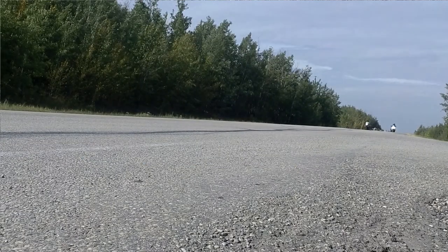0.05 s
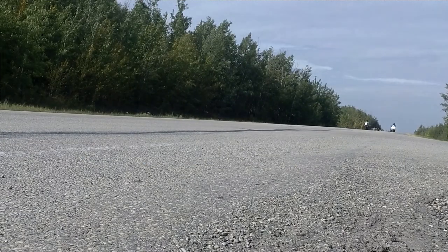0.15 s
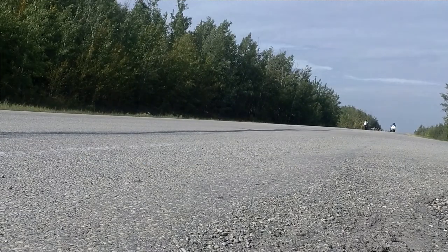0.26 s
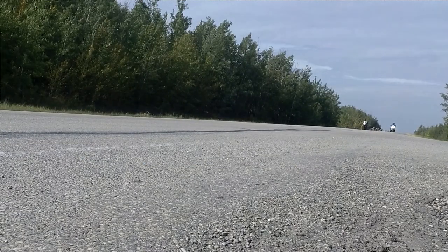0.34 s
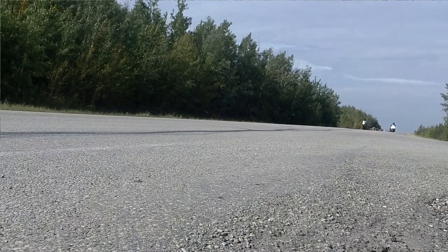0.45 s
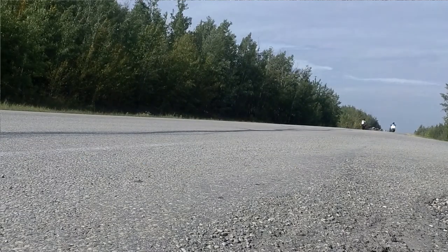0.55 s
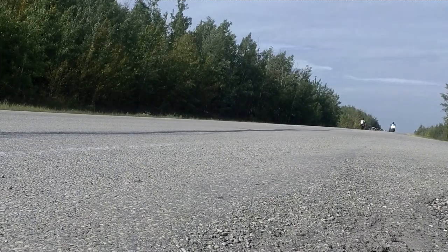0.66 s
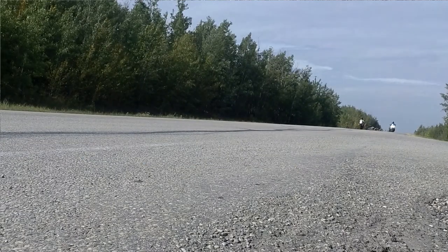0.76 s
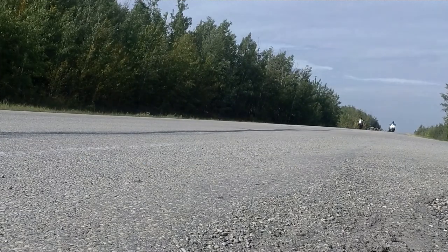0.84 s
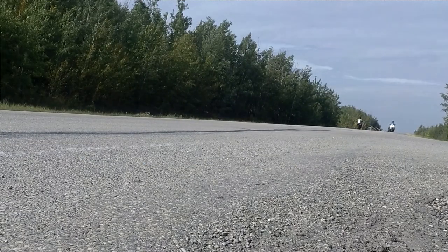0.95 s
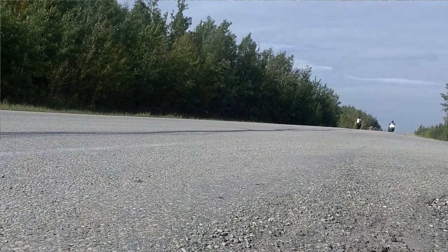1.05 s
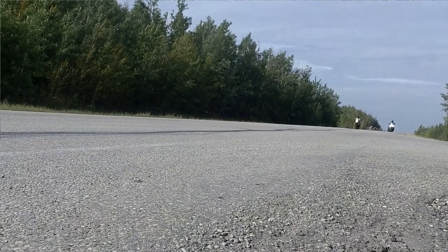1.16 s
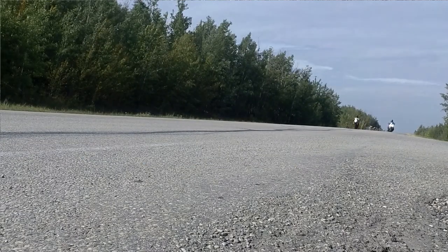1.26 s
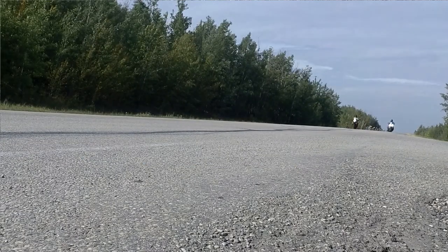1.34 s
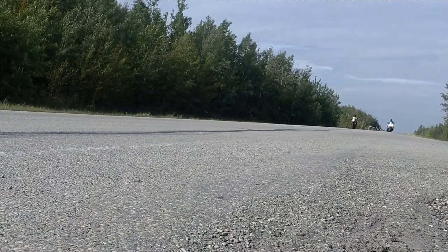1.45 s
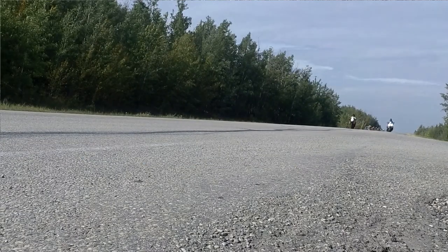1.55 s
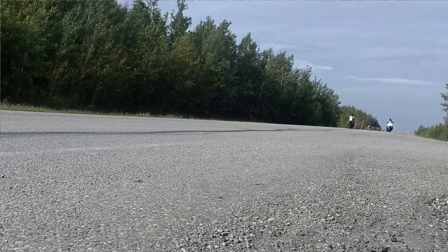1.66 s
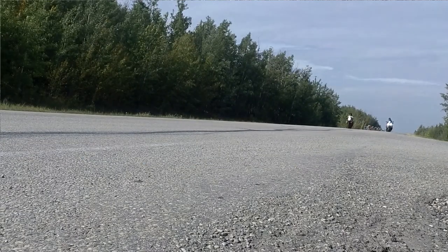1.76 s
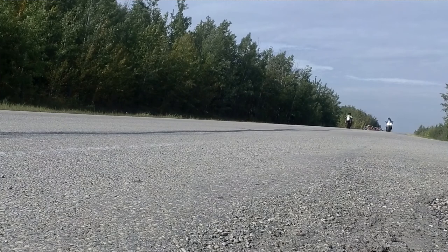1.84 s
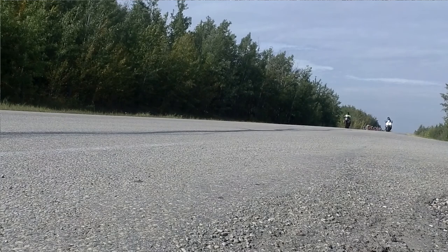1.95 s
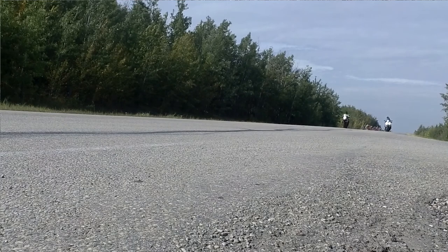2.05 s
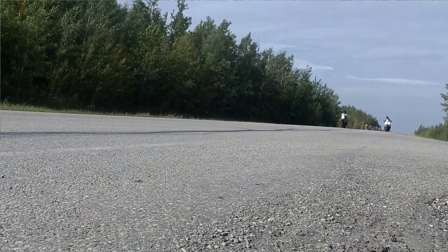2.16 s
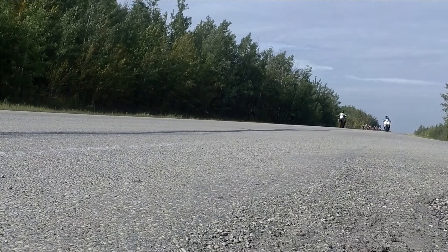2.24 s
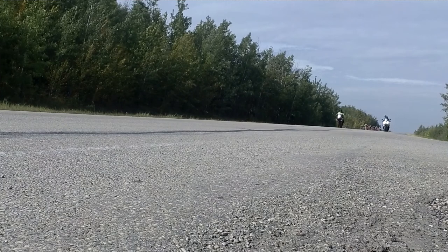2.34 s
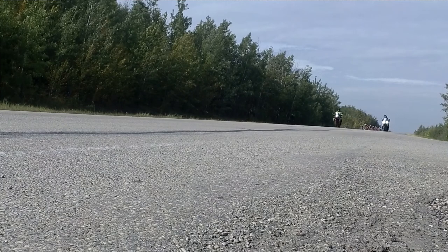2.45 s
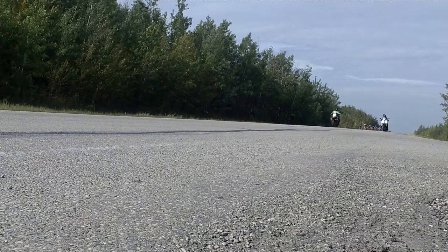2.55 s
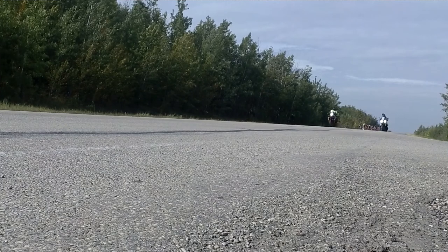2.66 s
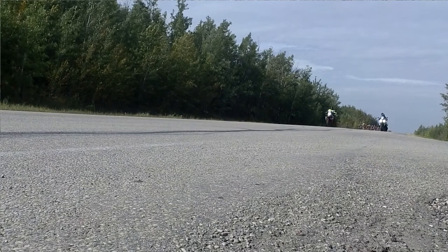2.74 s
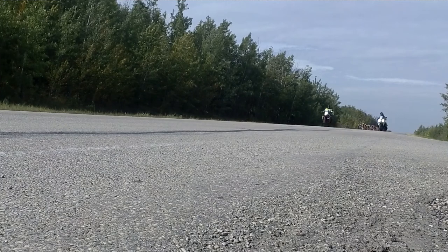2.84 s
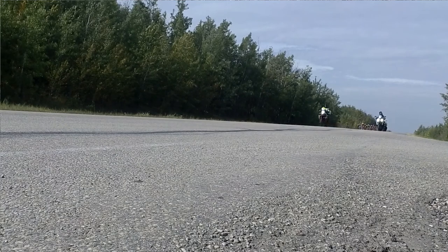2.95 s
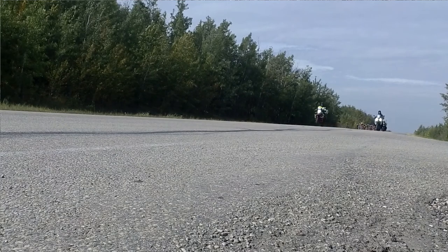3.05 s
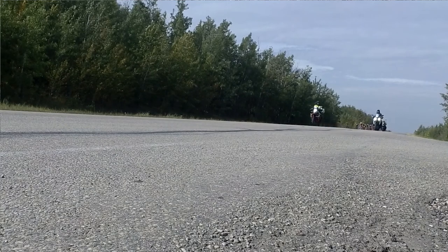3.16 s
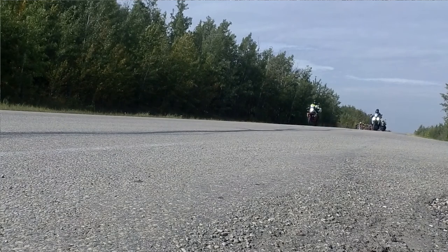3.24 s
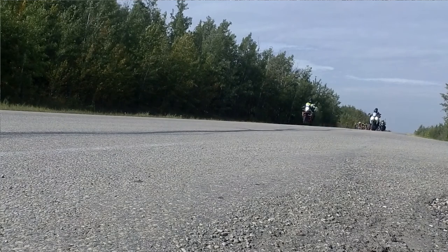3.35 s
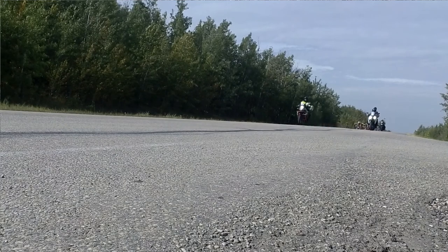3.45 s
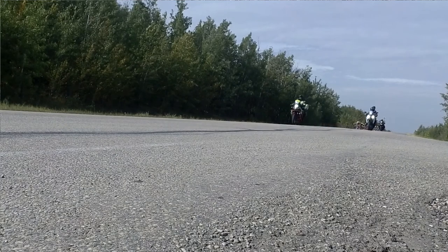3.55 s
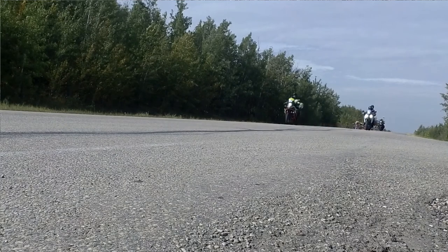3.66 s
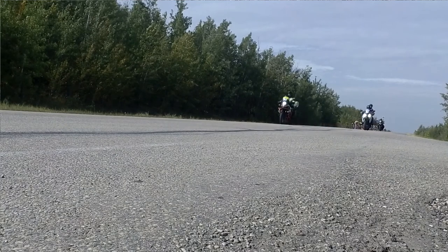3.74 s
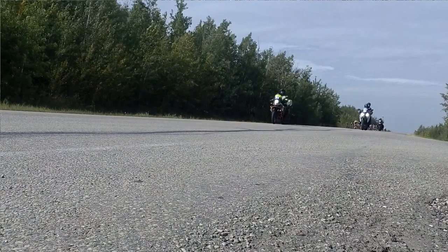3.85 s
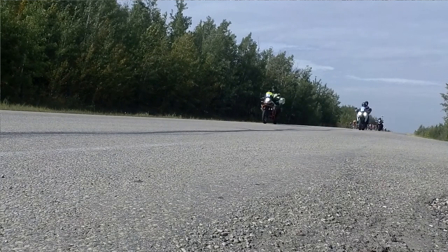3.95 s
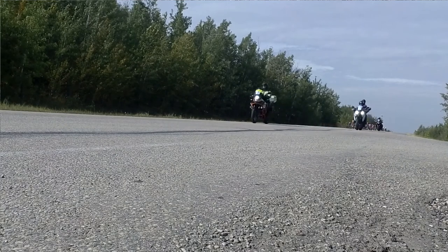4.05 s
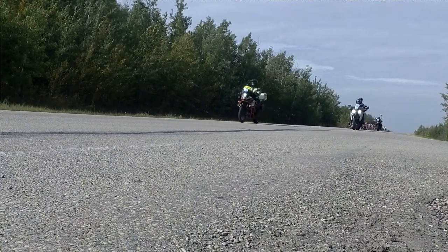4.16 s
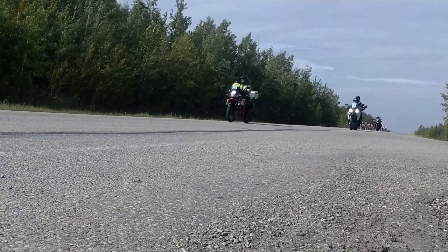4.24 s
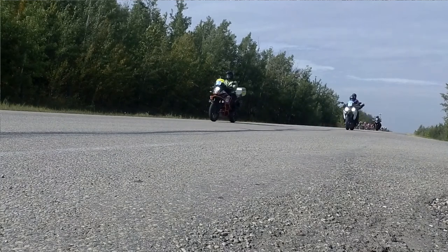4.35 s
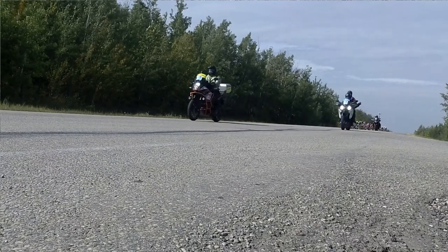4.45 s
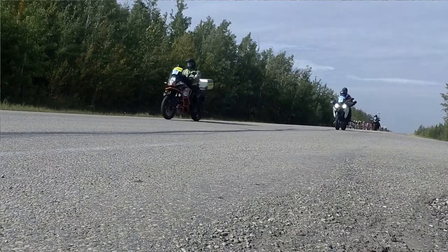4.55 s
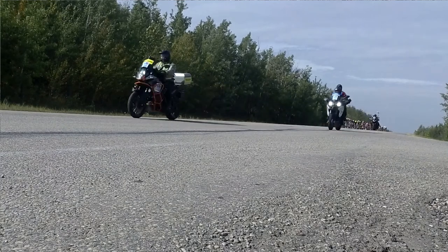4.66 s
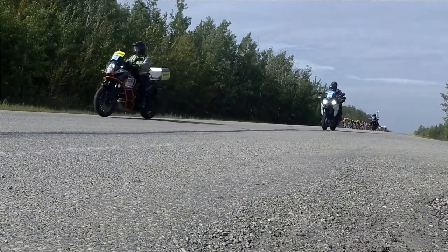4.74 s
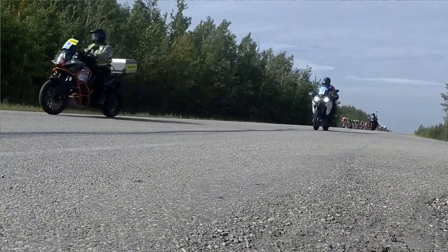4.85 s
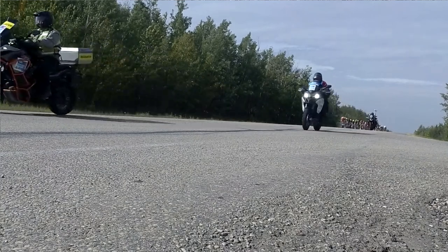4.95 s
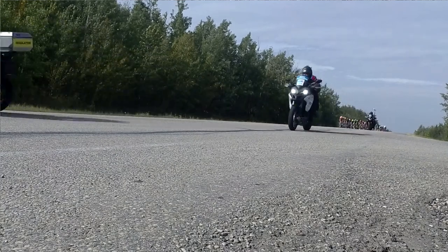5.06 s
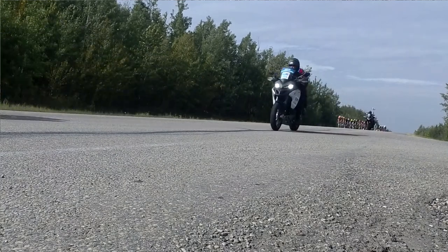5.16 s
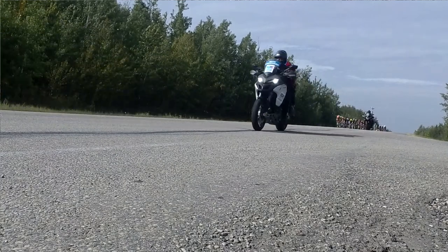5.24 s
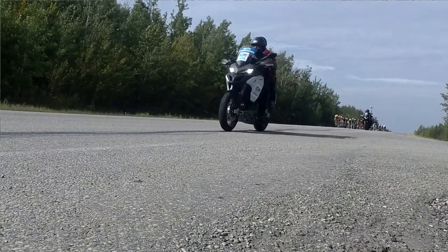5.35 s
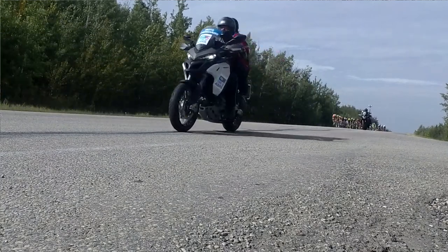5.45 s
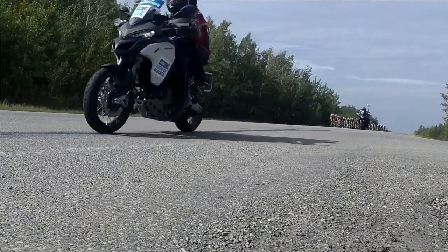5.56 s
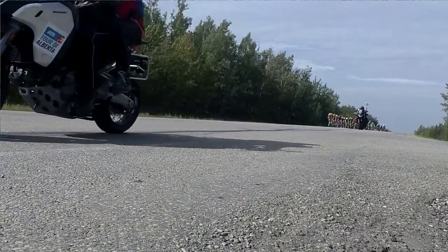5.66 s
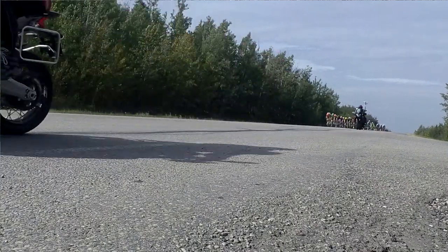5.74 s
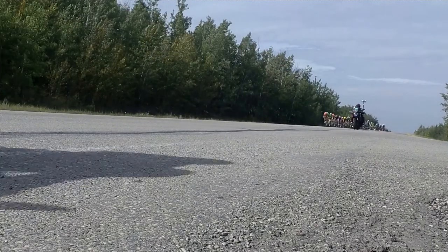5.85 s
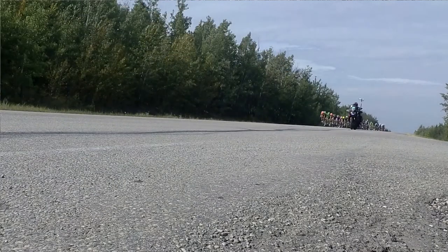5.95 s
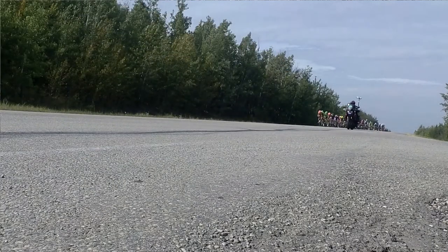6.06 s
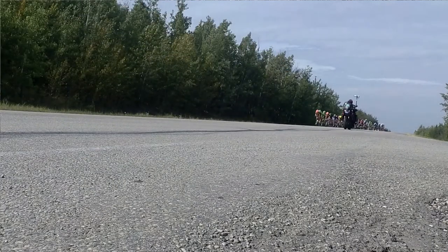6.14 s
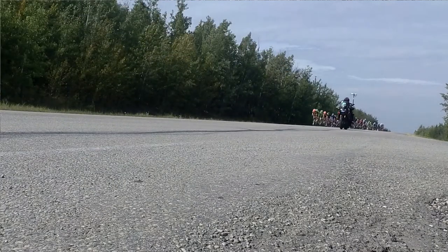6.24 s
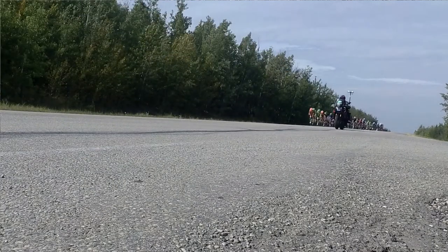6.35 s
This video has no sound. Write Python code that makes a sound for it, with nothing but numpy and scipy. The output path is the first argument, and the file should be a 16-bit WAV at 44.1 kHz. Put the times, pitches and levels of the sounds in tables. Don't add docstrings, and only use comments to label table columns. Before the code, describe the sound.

Low breeze and distant engine hum swell into a close motorcycle pass with tyre roar and hiss, dropping pitch, then backfiring pops.

```python
import sys
import numpy as np
from scipy import signal
from scipy.fft import rfft, irfft, next_fast_len
from scipy.io import wavfile
from scipy.ndimage import uniform_filter1d, map_coordinates

SR = 44100
rng = np.random.default_rng(int(sys.argv[2]) if len(sys.argv) > 2 else 0)


def file_out(sig):
    cols = np.atleast_2d(sig).T
    lim = np.clip(cols, -1, 1)
    pcm = np.round(lim * 32767).astype(np.int16)
    wavfile.write(sys.argv[1], SR, pcm)


def gain_from_decibels(decibels):
    exponent = np.asarray(decibels, float) / 20
    return 10 ** exponent


N = 282240


def seconds():
    return np.arange(N) / SR


def unit(x):
    return x / np.sqrt(np.mean(x ** 2) + 1e-20)


def curves(rows):
    s, *cols = np.transpose(rows)
    return [np.interp(seconds(), s, c) for c in cols]


def filtered(x, response):
    m = next_fast_len(N + 8192)
    spectrum = rfft(np.pad(x, 2048, "reflect"), m)
    return irfft(spectrum * response(np.fft.rfftfreq(m, 1 / SR)), m)[2048:N + 2048]


def wobble(rate):
    knots = rng.standard_normal(int(N * rate / SR) + 4)
    coarse = map_coordinates(knots, [np.arange(0, N + 64, 64) * rate / SR])
    return np.interp(np.arange(N) / 64, np.arange(len(coarse)), coarse)


def rush(spectrum, patchy_db):
    z = signal.stft(rng.standard_normal(N + 512), nperseg=512)[2]
    field = rng.standard_normal(z.shape)
    field = uniform_filter1d(uniform_filter1d(field, 5, 0), 10, 1)
    noise = signal.istft(z * gain_from_decibels(patchy_db * unit(field)), nperseg=512)[1][:N]
    f, db = np.transpose(spectrum)
    return unit(filtered(noise, lambda hz: gain_from_decibels(np.interp(np.log(hz + 1), np.log(f), db, -120, -120))))


# (time abreast [s], closest distance [m], distance over which the camera shades [m])
PASS_BY = [
    (5.3, 2.26, 4.7),
    (6.12, 11.2, 1.26),
]


def passing(law):
    road_m_s = 14
    *near_db, air_db, shade_db, floor_db, rise_db = law
    power = gain_from_decibels(2 * (floor_db + rise_db * seconds()))
    for (s, miss_m, shade_m), db in zip(PASS_BY, near_db):
        along = road_m_s * (seconds() - s)
        r = np.hypot(along, miss_m)
        shade = shade_db / (1 + np.exp(-along / shade_m))
        power = power + gain_from_decibels(2 * (db - air_db * r - shade)) / r ** 2
    return 10 * np.log10(power)


# (frequency [Hz], level [dB per Hz])
RUMBLE_SPECTRUM = [(15, -21), (35, 7), (100, 2), (200, -6.5), (400, -24), (700, -47)]
PACK_SPECTRUM = [(150, -27), (260, -0.5), (519, -6.5), (600, -5.5), (936, -14), (1220, -16.5), (2000, -28),
                 (2600, -53), (4400, -120)]
# (leader at 1 m [dB], twin at 1 m [dB], air loss [dB/m], shade [dB], floor [dB], rise [dB/s])
DRAUGHT = (-28.5, -7, 1.1, -9, -40.5, 0.54)


def wind():
    lumps = gain_from_decibels(1.2 * wobble(5))
    rumble = gain_from_decibels(passing(DRAUGHT)) * lumps * rush(RUMBLE_SPECTRUM, patchy_db=-1.0)
    pack_db = -51 + 1.88 * seconds()
    return rumble + gain_from_decibels(pack_db) * rush(PACK_SPECTRUM, patchy_db=1.0)


def firing(turns, orders, scatter_db, nulls=(), odd=(), size=1024):
    count = int(turns[-1]) + 6
    strength = scatter_db * rng.standard_normal(count)
    for s, db in odd:
        strength[round(turns[round(s * SR)])] += db
    k, db = np.transpose(orders)
    order = np.fft.rfftfreq(8 * size, 1 / size)
    level = gain_from_decibels(np.interp(order, [0, *k, k[-1] + 3], [-30, *db, -90]))
    for null in nulls:
        level = level * np.tanh(4 * (order - null))
    high = np.clip(order - 10, 0, None)
    lag = .1 * high ** 2 + 2.6 * np.sin(1.9 * high) + 8 * np.pi * order - .4
    low = 1 / (1 + (order / 8.5) ** 10)
    pulses = np.zeros(count * size)
    pulses[::size] = gain_from_decibels(strength)
    shapes = irfft(level * np.exp(-1j * lag) * [low, 1 - low])
    cycle = signal.fftconvolve(pulses[None], shapes, axes=1)
    parts = np.array([np.interp((turns + 4) * size, np.arange(len(c)), c) for c in cycle])
    return parts / np.std(parts.sum(0))


# (time [s], firing rate [cycles/s], level [dB])
FAR_RIDE = [(0, 22.1, -41), (.6, 22.3, -42), (1.2, 22.8, -44), (2.2, 23.8, -42), (2.9, 24.3, -45),
            (4, 24.8, -47), (5, 25.3, -44), (6.4, 25.5, -47)]
LEADER_RIDE = [(0, 30.9, -50), (1.1, 30.6, -48), (2.1, 30.3, -43), (3, 29.9, -42), (3.9, 29.7, -40),
               (4.4, 29.6, -36), (4.8, 29.5, -33), (5.15, 29.1, -29), (5.6, 28.2, -31), (5.95, 27.6, -37),
               (6.4, 27.2, -41)]
# (order [per cycle], level [dB])
FAR_VOICE = [(1, -21.5), (2, -8), (3, -26), (4, -0.5), (5, 9), (6, -3.5), (8, -27), (10, -10), (12, -27.5)]
LEADER_VOICE = [(1, -22), (2, -2.5), (3, 3), (4, -9), (5, -16), (6, -19.5), (7, -14), (8, -10), (9, -15),
                (10, -6), (11, -9.5), (12, -15.5), (14, -31), (16, -12), (20, -25.5)]


def other_bike(rows, orders, scatter_db, gain_db):
    speed, level_db = curves(rows)
    turns = np.cumsum(speed) / SR + 8
    return gain_from_decibels(level_db + gain_db + 1.3 * wobble(6.8)) * firing(turns, orders, scatter_db).sum(0), turns


SHUT_S = 6.137


def twin_turns():
    t = seconds()
    speed_m_s, miss_m, abreast_s = 14.9385, 3.098, 5.9726
    along = speed_m_s * (t - abreast_s)
    revs = 32.0049 + .1966 * t + .0214 * t ** 2 - 30 * np.clip(t - SHUT_S, 0, None)
    stretch = 1 + speed_m_s / 343 * along / np.hypot(along, miss_m)
    return np.cumsum(revs / stretch) / SR + 8.149


# (time [s], level [dB])
TWIN_LEVEL = [
    (0.05, -42),
    (1.45, -40),
    (3.32, -31.5),
    (4.91, -23),
    (4.99, -20.5),
    (5.98, -16),
    (6.13, -19.5),
]
# (order [per cycle], level [dB])
TWIN_VOICE = [(1, -16), (2, -9.5), (3, -6), (4, -16), (5, 2.5), (6, -1), (7, -6), (8, -16.5), (9, -16),
              (10, -14), (11, -17), (12, -22), (13, -16.5), (14, -24), (15, -20.5), (16, -39), (17, -21),
              (18, -22), (19, -23.5), (20, -18), (21, -40.5), (22, -32.5), (23, -26.5), (24, -29.5),
              (25, -30.5), (26, -24), (27, -27.5), (28, -26.5), (29, -35), (30, -35)]
PIPE_NULLS = (1.5, 4.4, 9.5)
# (time [s], size change [dB])
ODD_FIRINGS = [
    (3.418, -9),
    (5.797, -12),
]
# (order [per cycle], level [dB])
GEAR_TEETH = [(20, -33), (22, -31), (27, -31), (29, -31), (43, -28), (47, -30)]
FLANK_TEETH = [(17, -23), (19, -25), (22, -30), (24, -27), (26, -38), (29, -19.5), (32, -21)]


def twin():
    t, turns = seconds(), twin_turns()
    level_db, = curves(TWIN_LEVEL)
    abreast_s = 5.93
    bark_db = 1.8 - 7 * np.clip((t - abreast_s) / 0.16 + 0.52, 0, 1)
    throb, bark = firing(turns, TWIN_VOICE, scatter_db=.45, nulls=PIPE_NULLS, odd=ODD_FIRINGS)
    gears = sum(gain_from_decibels(db + 3 * wobble(5)) * np.sin(2 * np.pi * k * turns + .6 * wobble(14))
                for k, db in GEAR_TEETH)
    near = gain_from_decibels(np.clip(.7 * (level_db + 24), None, 0))
    near = near * np.clip((abreast_s - t) / .15 + 1, .15, 1)
    sweep = np.exp(-((t - 5.85) / 0.093) ** 4)
    flank = sum(gain_from_decibels(db + 1.4 * wobble(7)) * np.sin(2 * np.pi * k * turns + k * k + 0.42 * wobble(21))
                for k, db in FLANK_TEETH)
    fuel = np.clip((SHUT_S - t) / 0.009, 0, 1)
    load = .15 + .65 * fuel
    upper = load * bark + near * fuel * gears + sweep * flank
    return -gain_from_decibels(level_db + 1.04) * (gain_from_decibels(bark_db + 0.5 * wobble(3.72)) * upper + fuel * throb)


# (frequency [Hz], level [dB per
# Hz])
ROAR_SPECTRUM = [(150, -17.5), (250, -10), (402, -11), (694, -15.5), (760, -15), (999, -14), (1270, -16),
                 (1420, -15), (2800, -26), (3640, -52), (6160, -120)]
HISS_SPECTRUM = [(1290, -4), (2200, -4.5), (3230, -3.5), (3680, 0.5), (4050, -5.5), (4580, 0),
                 (6050, -21.5), (6350, -22.5), (6780, -14.5), (7180, -14), (8240, -22.5), (9540, -22.5),
                 (11600, -36.5), (14500, -39.5), (15400, -45.5)]
# (leader at 1 m [dB], twin at 1 m [dB], air loss [dB/m], shade [dB], floor [dB], rise [dB/s])
ROAR_PASSING = (-29, -1.66, 0.36, 41, -57.5, 2)
HISS_PASSING = (-8.5, -3.5, 0.6238, 42.5, -63, 1.46)
TOP_PASSING = (-18, -13.5, 0.85, 47, -81, 1.86)


def riding(turns):
    roar_db, hiss_db, top_db = passing(ROAR_PASSING), passing(HISS_PASSING), passing(TOP_PASSING)
    roar = gain_from_decibels(roar_db + 0.31 * wobble(4.1)) * rush(ROAR_SPECTRUM, patchy_db=-1.7)
    clatter = 1 + .06 * sum(np.cos(2 * np.pi * k * turns + k * k) for k in (1, 2, 3, 5, 6, 7))
    hiss = rush(HISS_SPECTRUM, patchy_db=0.5) * clatter
    low = filtered(hiss, lambda hz: 1 / (1 + (hz / 6100) ** 10))
    edge = filtered(hiss, lambda hz: 1 - 1 / (1 + (hz / 9500) ** 10))
    top = unit(hiss - low - edge + gain_from_decibels(top_db + 46) * edge)
    return roar + gain_from_decibels(hiss_db) * unit(low) + gain_from_decibels(top_db) * top


# (time [s], half length [s], pitch
# [Hz], width [Hz], level [dB])
TREAD_HOWLS = [(2.35, .65, 2800, 1600, -62), (4.55, .5, 4580, 300, -48.5), (4.22, .2, 8000, 1500, -62),
               (5.186, .045, 930, 160, -33), (5.4, .16, 850, 300, -35), (5.91, .04, 880, 90, -37),
               (6.3, .13, 1260, 350, -48), (5.98, .03, 620, 45, -33), (6.125, .02, 620, 90, -39),
               (6.237, .012, 614, 200, -41), (6.289, .006, 600, 200, -33)]


def howls():
    t, white = seconds(), rng.standard_normal(N)
    out = np.zeros(N)
    for s, half, hz, width, db in TREAD_HOWLS:
        band = unit(filtered(white, lambda f: np.exp(-((f - hz) / width) ** 2)))
        out += gain_from_decibels(db) * np.exp(-((t - s) / half) ** 4) * band
    return out


# (start [s], end [s], level [dB], sag [dB])
HORN_PRESSES = [
    (2.204, 2.316, -38.5, -1),
    (2.408, 2.498, -41.5, -4),
]
# (harmonic [number], level [dB])
HORN_VOICE = [(1, 1), (2, -30), (3, -30), (8, -15.5), (9, -5.5)]


def horn():
    t, out = seconds(), np.zeros(N)
    for start, end, db, sag_db in HORN_PRESSES:
        since = np.clip(t - start, 0, None)
        gate = np.clip(since / 0.0014, 0, 1) * np.clip((end - t) / 0.0027 + 1, 0, 1)
        climb = 0.0071 * 0.018 * np.exp(-since / 0.0076)
        phase = 2 * np.pi * 378.5 * (since + climb)
        sag = sag_db * since / (end - start)
        out += gate * sum(gain_from_decibels(db + 3.5 + level + sag * (k > 3)) * np.sin(k * phase) for k, level in HORN_VOICE)
    return out + gain_from_decibels(-16 + 4 * wobble(25)) * np.roll(out, round(.07 * SR))


# (time [s], level [dB], ring [Hz], boom [dB], crack [dB])
PIPE_BANGS = [
    (5.785, -7, 200, -1, -18),
    (6.1428, -3.5, 166, -1, -2),
    (6.179, -8.5, 190, -15, -24),
    (6.21, -11, 168, 2, -28),
    (6.246, -10, 171, 2, -26),
    (6.2805, -3, 208.5, -5, -6),
    (6.296, -13, 205.6, 3, -20),
    (6.321, -10, 195, -10, -20),
    (6.361, -15, 197, -1, -23),
]
# (time [s], level [dB], fall by 60 dB [s])
STONES = [
    (6.187, -50, .03),
    (6.229, -39, .07),
    (6.286, -47, .03),
]


def pops():
    out, ticks, t = np.zeros(N + SR), np.zeros(N), np.arange(SR // 4) / SR
    for s, db, hz, boom_db, crack_db in PIPE_BANGS:
        ring = np.sin(2 * np.pi * hz * t) + gain_from_decibels(boom_db) * np.sin(2 * np.pi * 109.5 * t)
        crack = gain_from_decibels(crack_db - 60 * t / 0.038) * np.sin(2 * np.pi * 1.87 * hz * t)
        attack = np.sin(np.clip(t / 0.0088, 0, 1) * np.pi / 2) ** 2
        out[round(s * SR):][:len(t)] -= gain_from_decibels(db + 1.5 - 60 * t / 0.071) * attack * (ring + crack)
    for s, db, t60 in STONES:
        start = round(s * SR)
        tick = gain_from_decibels(db - 60 * t / t60) * np.clip(t / 0.0022, 0, 1)
        ticks[start:][:len(t)] += tick[:N - start]
    gravel = [(400, -3), (4500, -14), (6200, -23), (7300, -25), (10000, -32), (15000, -52)]  # (Hz, dB per Hz)
    return out[:N] + ticks * rush(gravel, patchy_db=-0.5)


def scene():
    far = other_bike(FAR_RIDE, FAR_VOICE, scatter_db=2.1, gain_db=1)[0]
    leader, turns = other_bike(LEADER_RIDE, LEADER_VOICE, scatter_db=2.1, gain_db=2.5)
    return (wind() + far + leader + twin() + riding(turns) + howls() + horn() + pops())[None]


def low_pass(x):
    return signal.sosfilt(signal.butter(12, 15590, fs=SR, output="sos"), x)


# (frequency [Hz], level [dB per Hz])
MIC_SPECTRUM = [(200, 5), (7000, -3.5), (9000, -10.5), (12500, -11.5), (13300, -36.5)]


def record(dry):
    from_end = np.minimum(np.arange(N), np.arange(N)[::-1])
    ends = np.sin(np.pi / 2 * np.clip(from_end / 260, 0, 1)) ** 2
    mix = ends * (dry + gain_from_decibels(-75.0) * rush(MIC_SPECTRUM, patchy_db=4.0))
    return low_pass(mix)


dry = scene()
out = record(dry)
file_out(out)
```